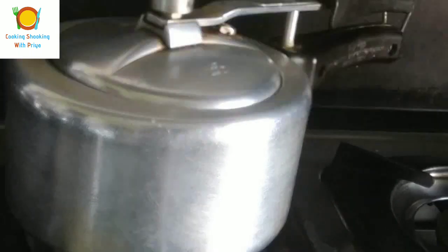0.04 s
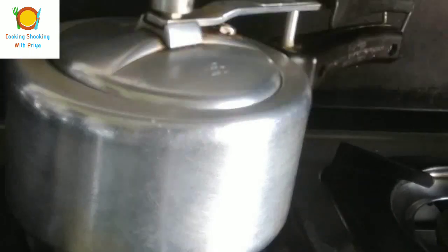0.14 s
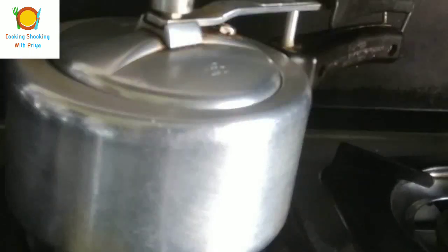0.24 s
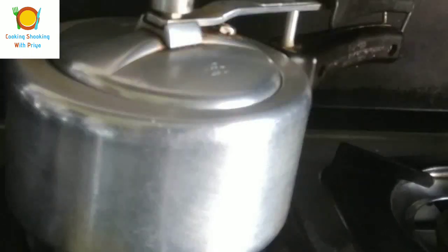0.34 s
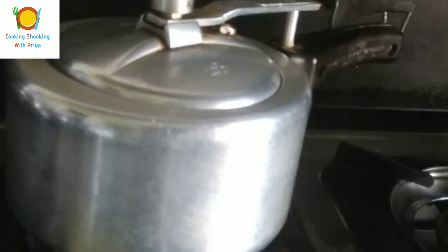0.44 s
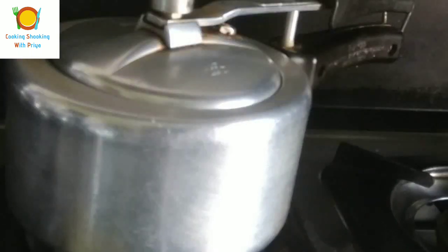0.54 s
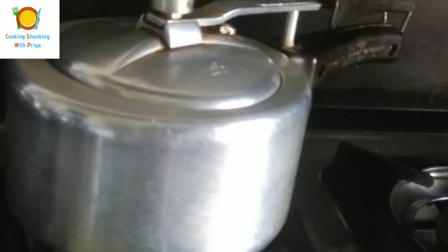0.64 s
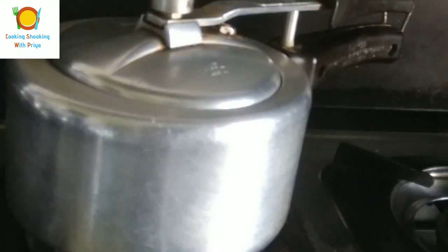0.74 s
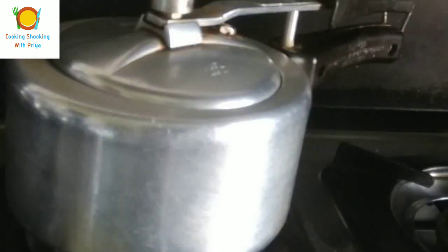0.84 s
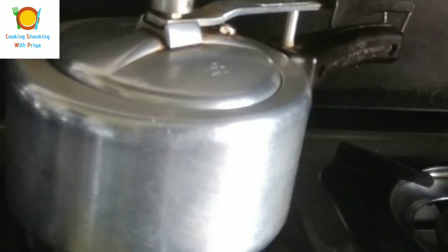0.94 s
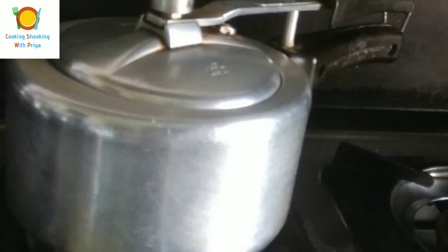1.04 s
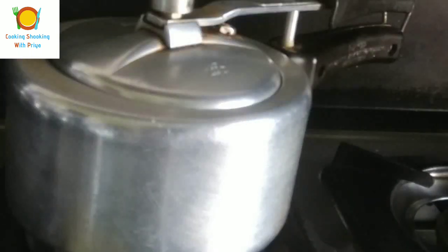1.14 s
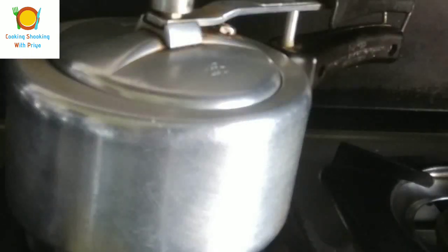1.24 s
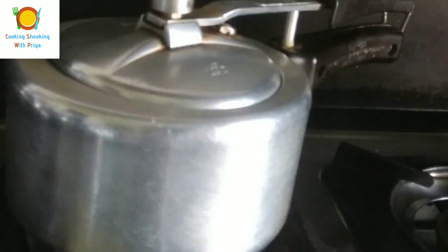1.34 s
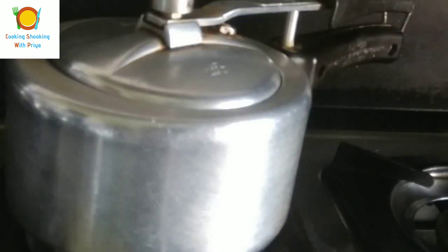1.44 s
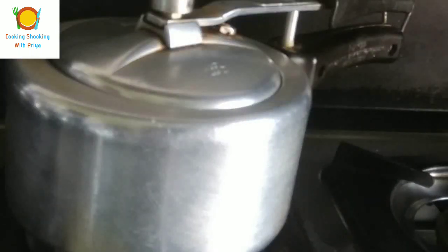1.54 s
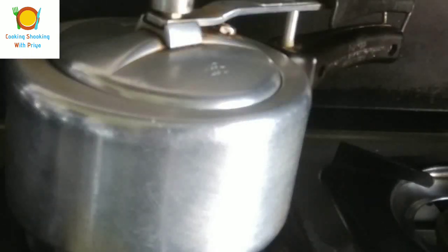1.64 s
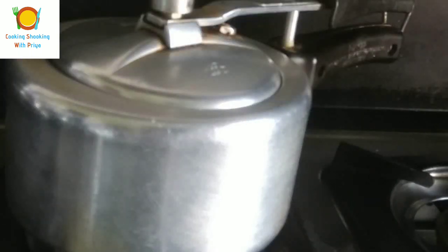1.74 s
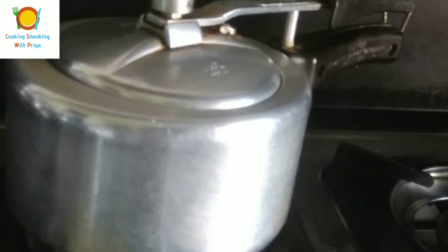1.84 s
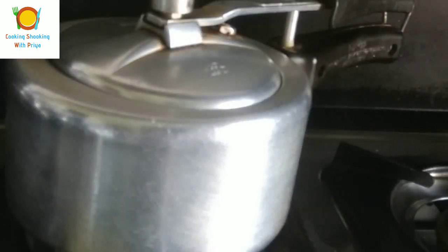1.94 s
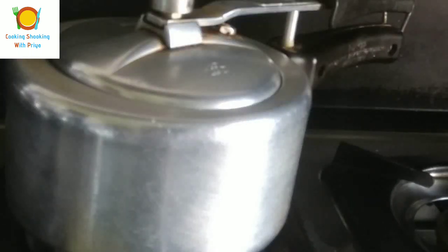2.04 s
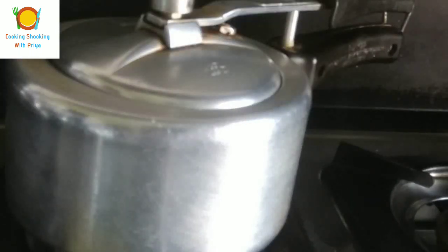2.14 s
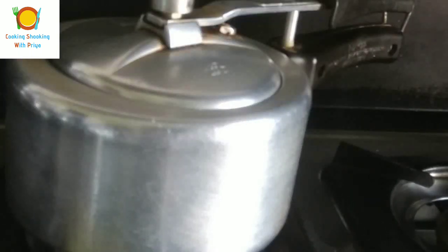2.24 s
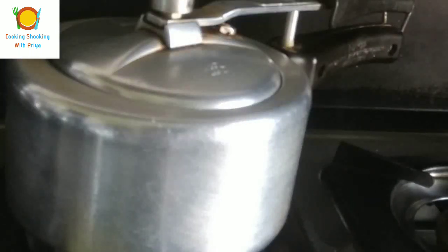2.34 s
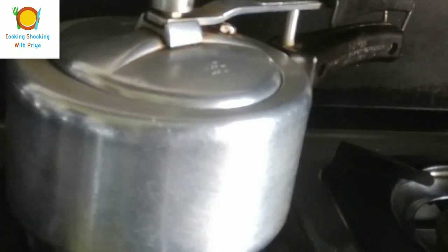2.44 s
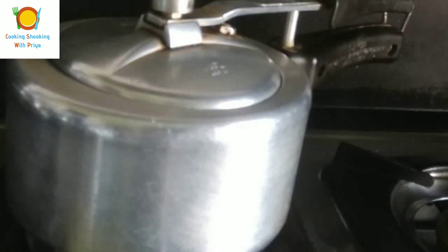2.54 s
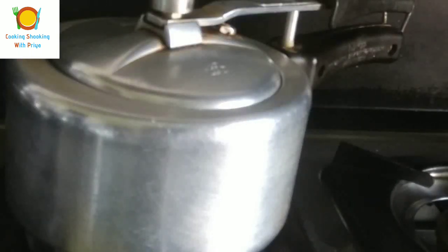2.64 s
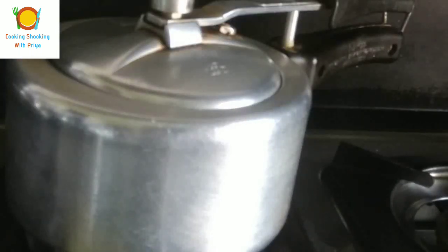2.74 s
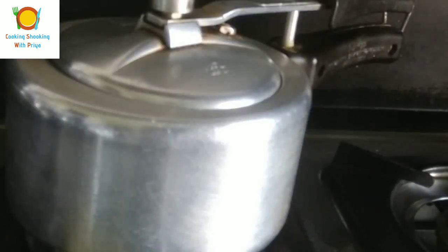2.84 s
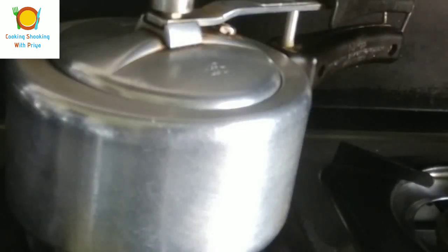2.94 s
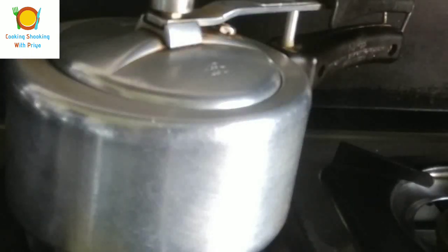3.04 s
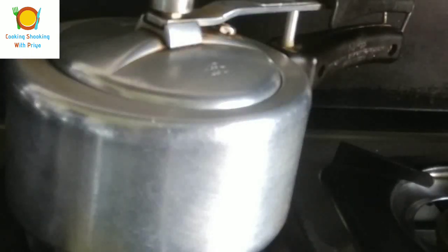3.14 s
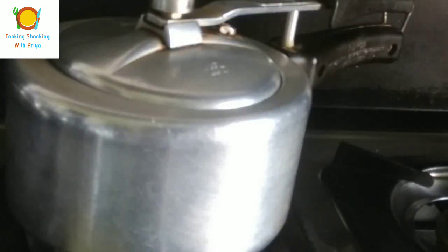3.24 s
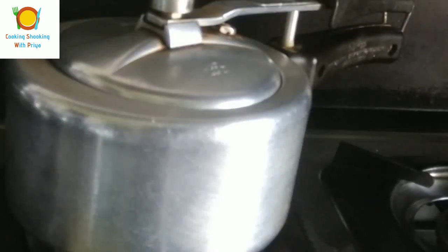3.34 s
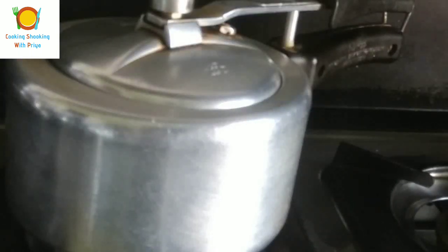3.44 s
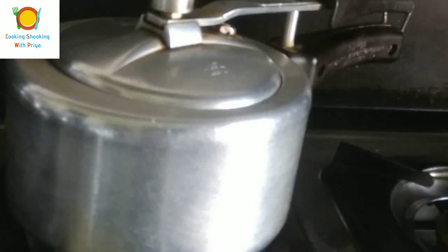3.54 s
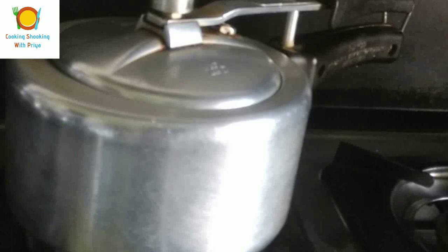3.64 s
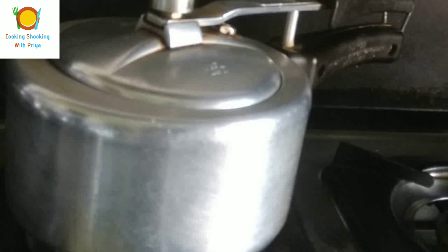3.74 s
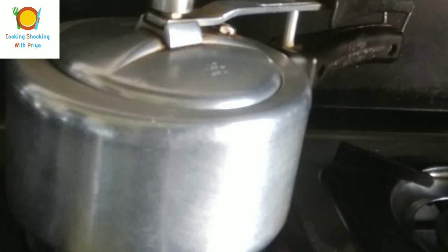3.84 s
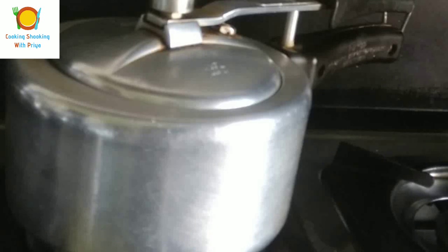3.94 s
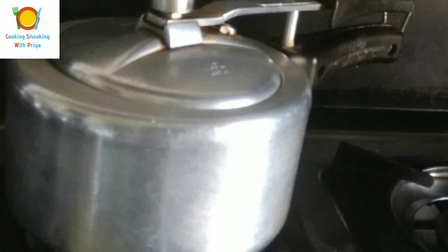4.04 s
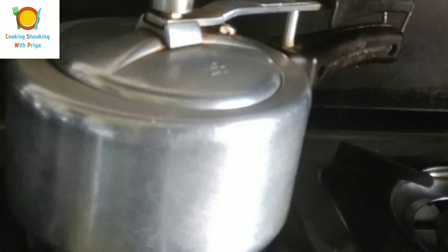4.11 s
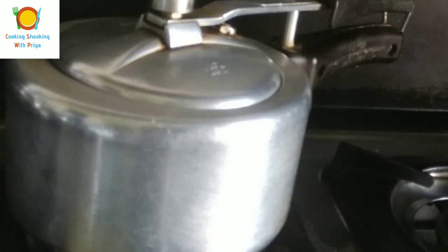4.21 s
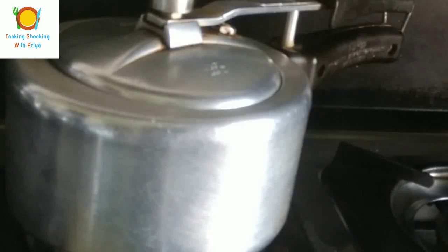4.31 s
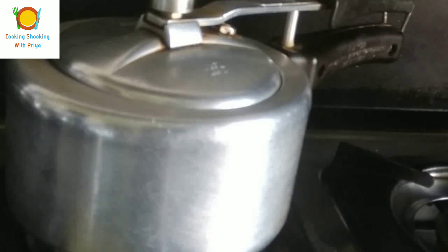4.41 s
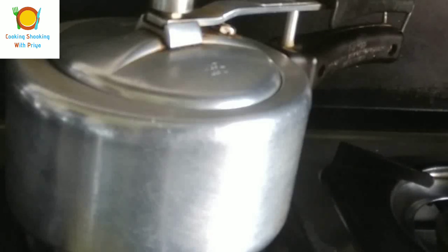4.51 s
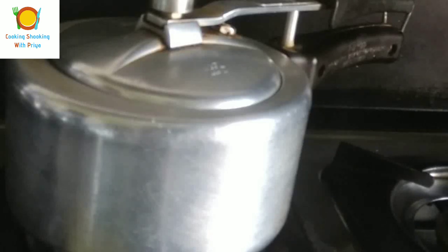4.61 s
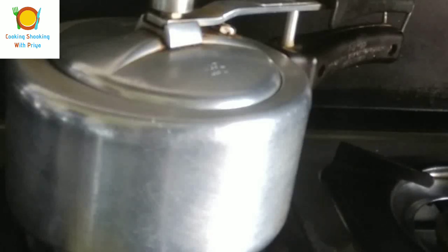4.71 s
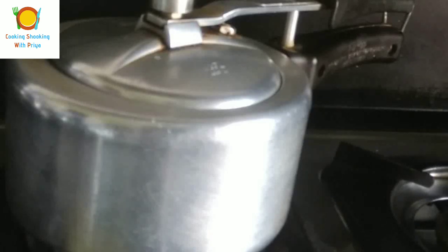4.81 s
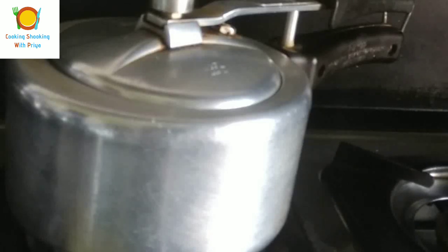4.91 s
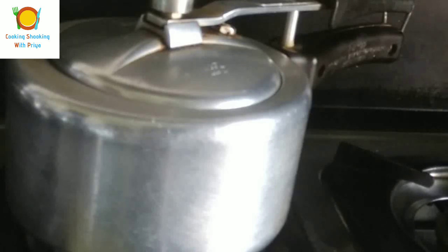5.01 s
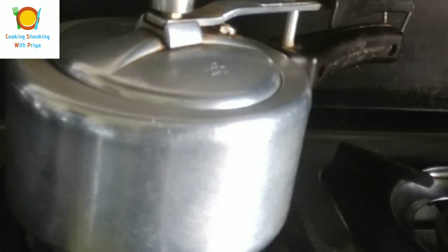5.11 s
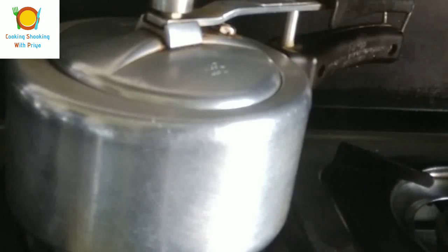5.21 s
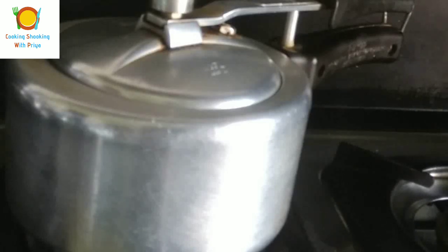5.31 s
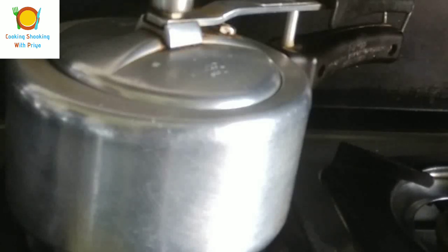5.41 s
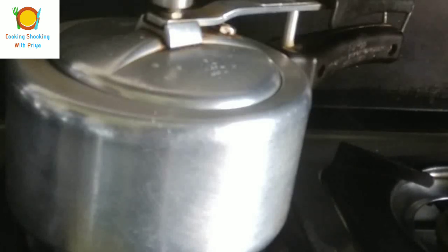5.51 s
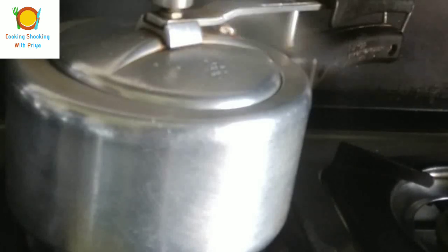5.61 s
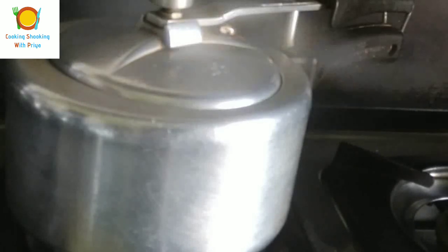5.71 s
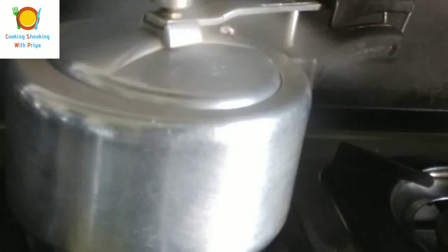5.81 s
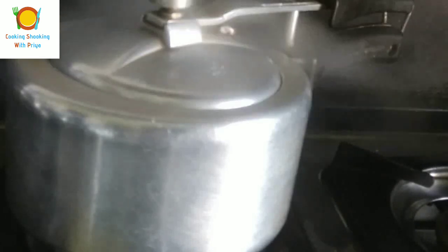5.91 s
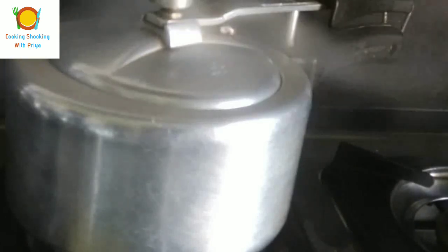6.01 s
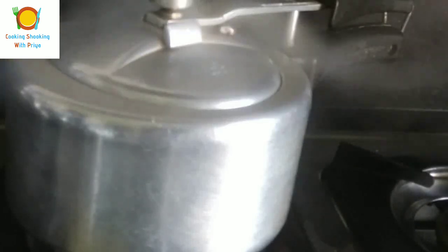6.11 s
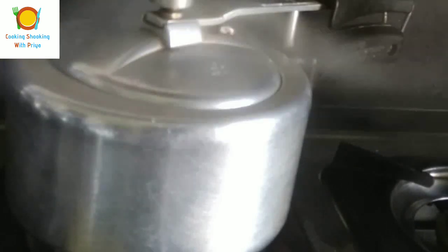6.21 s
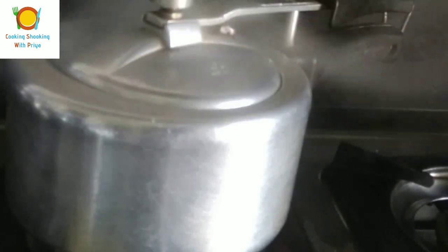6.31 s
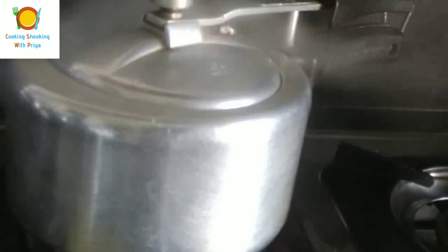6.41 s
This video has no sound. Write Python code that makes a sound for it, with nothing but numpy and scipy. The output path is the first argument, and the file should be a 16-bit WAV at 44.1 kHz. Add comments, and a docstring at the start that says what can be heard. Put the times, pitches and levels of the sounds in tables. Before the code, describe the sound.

Pressure cooker on a gas stove: clipped steam jet, quiet sputtering hiss, two dull knocks, quickening-strength puffs, clinks, then a roaring steam release.

```python
"""A pressure cooker on a gas stove, close to a phone whose right port faces the valve.
A blast of steam, noise coloured by the vent's resonances, is cut off. After a fade-in the valve seeps in three
surges with spat droplets over the burner's low rumble; thin tones at fixed pitches come and go. Two knocks ring
the counter, then a cut. After a second fade-in the weight rocks and the leak, noise throbbing with each puff,
grows stronger. The weight clinks and lifts, the steam blasts out; a whistle of narrow-band noise joins it."""
import sys
import numpy as np
from scipy import signal
from scipy.io import wavfile
from scipy.ndimage import uniform_filter1d

SR = 44100
rng = np.random.default_rng(int(sys.argv[2]) if len(sys.argv) > 2 else 0)


def transcribe(u):
    """Save the signal u as a 16-bit wav file named by the first command-line argument.

    u: samples, shape (n,) or (channels, n), limited to [-1, 1]; the rate is SR.
    q: integer samples, one column per channel.
    """
    v = np.clip(np.atleast_2d(u).T, -1, 1)
    q = np.round(v * 32767).astype(np.int16)
    wavfile.write(sys.argv[1], SR, q)


N = 284886

# Spectrum of the jet through the open vent: frequency_hz, left_db, right_db
BLAST_SPECTRUM = [(40, -42, -30.5), (150, -39, -26.5), (407, -33, -25), (910, -27, -24), (1444, -13, -19.5),
                  (1890, -15, -16.5), (2600, -10.5, -11.5), (2730, -10, -11), (3020, -14.5, -4.5),
                  (3450, -23, -8), (4100, -16.5, -8.5), (4444, -19.5, -6.5), (5240, -12, -4.5),
                  (7100, -10, -2), (7950, -11, -1), (9250, -8.5, 0.5), (10600, -5, -1), (13600, -2.5, -2.5),
                  (15500, -8, -5)]
# Spectrum of the leak under the rocking weight: frequency_hz, left_db, right_db
LEAK_SPECTRUM = [(720, -23, -21), (1410, -14.5, -22), (1750, -15, -16), (1980, -14.5, -14.5),
                 (2340, -13.5, -23), (2630, -19, -10.5), (2970, -17, -9), (3280, -34.5, -13),
                 (3540, -28, -11.5), (3870, -27, -10), (4840, -24, -12), (5240, -18, -3.5),
                 (7100, -16, -1.5), (8760, -15, -4), (10100, -14, 0), (11400, -11.5, -1), (12400, -8.5, -4),
                 (14100, -8.5, -3.5), (15500, -11.5, -15)]
# Spectrum of the steam seeping under the seated weight: frequency_hz, left_db, right_db
SEEP_SPECTRUM = [(4700, -45, -22), (5200, -29, -3), (6000, -28, 0), (7000, -27, -3), (8500, -34, -4),
                 (10800, -32, -2), (11700, -20, -3), (12500, -30, -3), (13700, -32, -7), (14200, -27, -14),
                 (15300, -32, -20)]
# Fuller body that a strong surge adds to the seep: frequency_hz, left_db, right_db
SURGE_SPECTRUM = [(1700, -11, -28), (2680, -13, -7.5), (3470, -29, -2), (4500, -28, 5), (5500, -22, -12),
                  (7500, -23, -16), (9000, -30, -9)]
# Spectrum of the flame before the cut: frequency_hz, left_db, right_db
FLAME_SPECTRUM = [(30, -38, -26), (70.4, -34, -22), (124, 1, 3), (507, 1, 1.5), (615, -10, -11),
                  (800, -4, -3), (937, -10.5, -16.5), (1150, -30, -34)]
# Spectrum of the flame after the second fade-in: frequency_hz, left_db, right_db
HIGH_FLAME_SPECTRUM = [(30, -34, -40), (71.5, -22, -21), (131, 1.5, 1.5), (263, -2, -3), (487, -1.5, -0.5),
                       (575, -3.5, -5), (1030, -7, -10), (1430, -4.5, -6)]
# Spectrum of the rumble's upper edge, mostly on the left: frequency_hz, left_db, right_db
UPPER_RUMBLE_SPECTRUM = [(900, -26, -30), (1025, -1, -12), (1280, -7.5, -27), (1406, 0.5, -16.5),
                         (1900, -38, -32.5), (2450, -28, -23.5), (4000, -56, -51)]
# Resonances of the valve while the weight sits on it: frequency_hz, width_hz, lift_db
VALVE_RESONANCES = [(5240, 90, 5.5), (6050, 95, 11), (11050, 250, 4), (13200, 200, -1.5), (15040, 120, 12)]
# Resonances of the open vent: frequency_hz, width_hz, lift_db
VENT_RESONANCES = [(3000, 310, 1), (3650, 100, -4.5), (3920, 130, 2.5), (4400, 120, -4), (6840, 99, 3),
                   (7210, 63, 1), (8190, 240, 2), (8880, 39, 4.5), (9100, 200, 0.5), (10300, 210, 3.5),
                   (11280, 71, 3), (14300, 270, 0), (14700, 170, 3)]
# Likeness of left and right for sound from the valve: frequency_hz, correlation
PORT_LIKENESS = [(900, .3), (1500, .7), (1750, .99), (2450, .99), (2800, .3), (3400, .1), (9000, .12),
                 (13000, .25)]
# Phase turn that sets left and right opposite near 2 kHz: frequency_hz, turn_rad
PHASE_TURN = [(1000, -.4), (1400, .7), (1700, 1.2), (2400, .45), (3000, 0)]
# Level of the flame after the second fade-in: time_s, level_db
HIGH_FLAME_LEVEL = [(2.556, -79), (2.66, -64.5), (2.8, -61), (3.9, -61), (4.8, -58.5), (5.35, -53),
                    (5.45, -52.5), (6.46, -62.5)]
# Level of the rumble's upper edge: time_s, level_db
UPPER_RUMBLE_LEVEL = [(.15, -104), (.28, -76), (.42, -86), (.64, -78.5), (.86, -89), (.93, -77),
                      (1.04, -74.5), (1.19, -94), (1.28, -84), (1.42, -87), (1.52, -81), (1.66, -84.5),
                      (1.82, -74), (1.96, -78.5), (2.06, -84), (2.16, -77), (2.36, -84.5)]
# Breathy whistle within the second blast: time_s, level_db (right port)
WHISTLE_LEVEL = [(5.75, -31), (6.05, -43), (6.15, -25.5), (6.46, -27.5)]
# Rocks of the weight, before smoothing: puff_s, puff_db, seated_s, seated_db
WEIGHT_ROCKS = [(2.711, -46, 2.741, -51), (2.783, -40, 2.824, -51), (2.85, -45, 2.89, -50),
                (2.974, -41, 3.014, -46), (3.036, -40, 3.082, -49), (3.122, -42, 3.169, -49),
                (3.232, -39.5, 3.283, -46), (3.315, -41, 3.377, -47), (3.49, -35, 3.555, -45),
                (3.608, -36.5, 3.656, -44), (3.713, -36, 3.757, -45), (3.816, -36.5, 3.86, -45),
                (3.947, -33, 4.017, -41), (4.062, -34.5, 4.124, -42), (4.165, -34, 4.209, -41),
                (4.268, -35, 4.328, -41), (4.406, -34, 4.46, -39), (4.498, -34, 4.569, -40),
                (4.623, -32, 4.68, -38), (4.752, -32, 4.82, -38), (4.942, -31, 5.022, -39),
                (5.076, -31, 5.127, -37), (5.225, -26.5, 5.305, -36)]
# Surges of the seep: start_s, level_db, hold_s (until it dies away)
SEEP_SURGES = [(0.228, -60, 0.4), (.905, -59.5, 0.46), (1.736, -59, .47)]
# Droplets spat through the valve, before band-pass and panning: start_s, level_db
SPAT_DROPLETS = [(.2465, -50), (.282, -49), (.307, -47), (.922, -48), (.976, -40), (0.999, -36.5),
                 (1.79, -46), (1.8, -47), (1.831, -39), (2.079, -44), (2.136, -49)]
# Clinks of the weight on the vent as it tips, before panning: start_s, level_db, pitch_hz
WEIGHT_CLINKS = [(5.203, -36.5, 1350), (5.396, -33.5, 1500)]
# Faint tones that come and go: start_s, end_s, pitch_hz, pitch_spread_hz, left_db, right_db
THIN_TONES = [(.55, .68, 3380, 30, -110, -85), (.68, .8, 3365, 10, -110, -75),
              (.8, .94, 3360, 10, -110, -80), (.95, 1.01, 3360, 15, -110, -76),
              (1.04, 1.14, 3360, 12, -110, -73), (1.42, 1.46, 2860, 20, -110, -77),
              (1.51, 1.7, 2860, 10, -110, -74), (1.78, 1.9, 2870, 20, -110, -78),
              (1.95, 2.0, 2850, 15, -110, -74), (1.43, 1.58, 490, 12, -65, -65)]
# Knocks on the counter, before filtering and panning: start_s, level_db
COUNTER_KNOCKS = [(2.411, -37), (2.505, -47.5)]
# Modes of the counter: pitch_hz, level_db, t60_s
COUNTER_MODES = [(206, -14, 0.12), (330, -31, .03), (515, -11, 0.062), (814, -4, 0.011), (1450, -9, 0.0093),
                 (2300, -26, .008)]

CUT_S, RETURN_S, RETURN_DB = 2.527, 2.56, -66
RETURN_KNEE_S, RETURN_KNEE_DB = 0.029, -63.5  # knee: delay after RETURN_S, and level there
FADE_IN_S, FADE_LENGTH_S, FADE_DEPTH_DB = 0.11, 0.17, 22.5

# First blast: its level, the moment it is cut off, and the short tail it leaves
CUT_BLAST_DB, BLAST_CUT_S, TAIL_DROP_DB, TAIL_HOLD_S, TAIL_END_S = -14, .094, 22.5, .011, 0.13
FADE_IN_BLAST_S = .003
CUT_BLAST_BASS_HZ = 220  # the first blast carries no deep bass
# A jet that has run a while is thinner in this band
CUT_BLAST_THIN_HZ, CUT_BLAST_THIN_SHARE = (1800, 4600), .35
# Second blast: the jet opens at a steady rate in dB, overshoots and holds
LIFT_S, OPEN_S, LIFT_DB, BLAST_DB, OVERSHOOT_DB, OVERSHOOT_S = 5.31, 0.11, -51, -15, 1.5, 0.15
WHISTLE_HZ, WHISTLE_WIDTH_HZ = 6220, 76

# The leak flares as the weight lifts
LAST_PUFF_S, LAST_PUFF_DB, LEAK_END_S, LEAK_END_DB = 5.39, -24, 5.46, -28
CALM_HZ = 4900  # the jet is smoother above this
TOP_SPLIT_HZ, TOP_THROB_SHARE = 8500, 0.71  # the highest part throbs a little less
BODY_THROB_SHARE, BODY_MEMORY_S = .55, .12  # the body follows the puffs only in part
SPUTTER_PER_S, SPUTTER_S, SPUTTER_DB = 70, .0015, 1.7  # wet bursts; dB per unit of burst strength
CLINK_T60_S, CLINK_PAN_DB = 0.041, 2

# Each surge swells to a spit soon after it opens
SURGE_ATTACK_S, SPIT_S, SPIT_DB, SPIT_FALL_S = 0.011, 0.098, 3, 0.022
SAG_DB_PER_S, DIE_DB_PER_S, SEEP_REST_DB = 5, 33, -68
# Body gain relative to the flow when it is at SURGE_FULL_DB; it grows as a power of the flow
SURGE_DB, SURGE_POWER, SURGE_FULL_DB = -13, 3.1, -58
SEEP_SPLIT_HZ, SEEP_LOW_POWER = 8000, 1.9  # below the split the seep dies faster
DROPLET_HZ, DROPLET_T60_S = (5200, 13500), .004

BURNER_DB = -65
BLOW_TOP_HZ = 2600  # a soft contact carries little treble
RATTLE_T60_S, RATTLE_HZ = .2, (150, 1400)  # noisy tail of each knock
THIN_HISS_HZ, THIN_HISS_WIDTH_HZ, THIN_HISS_DB = 14580, 200, -70.5  # level is the mean of the two ports
TONE_SWELL_DB = 5  # each tone is softer at its ends

PORT_LAG_S = .00018  # sound from the valve reaches the left port later
TURN_DRIFT_RAD = .5  # spread of the drift in the phase turn, so the spectral hollow shifts
TOP_HZ = 15460


def blast():
    """Turbulent jet noise: the open vent's resonances colour a full flow of steam."""
    tail_db = CUT_BLAST_DB - TAIL_DROP_DB
    first = curve([(0, CUT_BLAST_DB), (BLAST_CUT_S, CUT_BLAST_DB), (BLAST_CUT_S + 0.0018, tail_db),
                   (BLAST_CUT_S + TAIL_HOLD_S, tail_db - 0.5), (TAIL_END_S, -87)])
    first = first * np.minimum(np.arange(N) / SR / FADE_IN_BLAST_S, 1)
    open_s = LIFT_S + OPEN_S
    second = curve([(LIFT_S, LIFT_DB), (open_s, BLAST_DB + OVERSHOOT_DB),
                    (open_s + OVERSHOOT_S, BLAST_DB), (N / SR, BLAST_DB)])
    likeness = [(900, 0.075), (1700, 0.48), (2400, 0.51), (3000, 0.042), (9000, .1), (14000, 0.14)]
    jet = hiss(BLAST_SPECTRUM, likeness, VENT_RESONANCES,
               patchy_db=3.0, flutter_db=0.5, calm_share=0.8, streak_db=1.1)
    band = zero_phase(jet, 2, CUT_BLAST_THIN_HZ, "bandpass")
    thin_jet = zero_phase(jet - CUT_BLAST_THIN_SHARE * band, 2, CUT_BLAST_BASS_HZ, "highpass")
    whistle = narrow(WHISTLE_HZ, WHISTLE_WIDTH_HZ) * curve(WHISTLE_LEVEL) * undb([[-9], [0]])
    return thin_jet * first + jet * second + whistle


def leak():
    """Flow-modulated noise: each rock of the weight lets out a sputtering puff, deepest in the lower treble."""
    rows = [(RETURN_S, RETURN_DB), (RETURN_S + RETURN_KNEE_S, RETURN_KNEE_DB)]
    for puff_s, puff_db, seated_s, seated_db in WEIGHT_ROCKS:
        rows += [(puff_s, puff_db), (seated_s, seated_db)]
    rows += [(LAST_PUFF_S, LAST_PUFF_DB), (LEAK_END_S, LEAK_END_DB)]
    # abs guards the powers below against rounding under zero
    flow = np.abs(uniform_filter1d(curve(rows), 600))
    mean_flow = np.abs(uniform_filter1d(flow, int(BODY_MEMORY_S * SR)))

    def throb(share):
        """Geometric mixing: blend the momentary flow with its running mean."""
        return flow ** share * mean_flow ** (1 - share)

    steam = hiss(LEAK_SPECTRUM, PORT_LIKENESS, VALVE_RESONANCES,
                 patchy_db=2.8, flutter_db=.6, calm_share=.55, streak_db=1.2)
    body = zero_phase(steam, 4, CALM_HZ)
    below_top = zero_phase(steam, 4, TOP_SPLIT_HZ)
    top = (steam - below_top) * throb(TOP_THROB_SHARE)
    lower_treble = (below_top - body) * flow

    size = int(SPUTTER_S * SR)
    drops = (rng.random(N) < SPUTTER_PER_S / SR) * rng.exponential(size=N)
    bursts = np.minimum(size * uniform_filter1d(drops, size), 3)
    sputter = undb(SPUTTER_DB * bursts)
    return sputter * (top + lower_treble) + body * throb(BODY_THROB_SHARE)


def clinks():
    """Damped oscillation: each tip of the weight is one short dull ring, slightly to the left."""
    t, out = np.arange(SR // 10) / SR, np.zeros(N)
    for start_s, level_db, pitch_hz in WEIGHT_CLINKS:
        i = int(start_s * SR)
        out[i:i + len(t)] += undb(level_db) * np.sin(2 * np.pi * pitch_hz * t) * decay(t, CLINK_T60_S)
    return out * undb([[CLINK_PAN_DB], [-CLINK_PAN_DB]])


def seep():
    """Flow noise of a narrow gap: as a surge weakens, its lower body falls faster than its treble."""
    flow = faded_in(SEEP_REST_DB)
    for start_s, level_db, hold_s in SEEP_SURGES:
        spit_s, die_s = start_s + SPIT_S, start_s + hold_s
        end_s = min(die_s + .5, CUT_S)
        sagged_db = level_db - SAG_DB_PER_S * hold_s
        surge = curve([(start_s, SEEP_REST_DB), (start_s + SURGE_ATTACK_S, level_db),
                       (spit_s, level_db + SPIT_DB), (spit_s + SPIT_FALL_S, level_db),
                       (die_s, sagged_db), (end_s, sagged_db - DIE_DB_PER_S * (end_s - die_s))])
        flow = np.maximum(flow, surge)
    strength = flow / undb(SURGE_FULL_DB)
    body_gain = undb(SURGE_DB) * flow * strength ** (SURGE_POWER - 1)
    # here the valve's resonances lift only half as many dB
    resonances = [(hz, width_hz, lift_db / 2) for hz, width_hz, lift_db in VALVE_RESONANCES]
    steam = hiss(SEEP_SPECTRUM, PORT_LIKENESS, resonances, patchy_db=3, flutter_db=.8)
    lower = zero_phase(steam, 4, SEEP_SPLIT_HZ)
    treble = steam - lower + lower * strength ** (SEEP_LOW_POWER - 1)
    body = hiss(SURGE_SPECTRUM, PORT_LIKENESS, patchy_db=7, flutter_db=0.0)
    return treble * flow + body * body_gain


def droplets():
    """Impulsive noise: each droplet is a short bright crack, mostly on the port that faces the valve."""
    t, out = np.arange(SR // 50) / SR, np.zeros(N)
    cracks = rng.standard_normal((len(SPAT_DROPLETS), len(t)))
    for (start_s, level_db), crack in zip(SPAT_DROPLETS, cracks):
        i = int(start_s * SR)
        out[i:i + len(t)] += undb(level_db) * crack * decay(t, DROPLET_T60_S)
    sos = signal.butter(6, DROPLET_HZ, "bandpass", fs=SR, output="sos")
    return signal.sosfilt(sos, out) * undb([[-18], [4]])


def burner():
    """Combustion noise: a flame's broad low rumble, alike on both ports in the bass, with a steep treble slope."""
    no_path = dict(lag_s=0, turn=[(0, 0)])  # no delay or fixed phase turn between left and right
    low = hiss(FLAME_SPECTRUM + [(4000, -90, -90)], [(150, 0.84), (600, .6), (1200, 0.018)],
               patchy_db=2.5, flutter_db=0.5, **no_path)
    upper = hiss(UPPER_RUMBLE_SPECTRUM, [(900, .2), (1200, .02)],
                 patchy_db=5.0, flutter_db=0.0, **no_path)
    high = hiss(HIGH_FLAME_SPECTRUM + [(3000, -53, -18.5)], [(150, 1.0), (600, 0.92), (1400, 0.19)],
                patchy_db=0.5, flutter_db=0.5, **no_path)
    upper_gain = curve(UPPER_RUMBLE_LEVEL + [(CUT_S, -76)])
    return low * faded_in(BURNER_DB) + upper * upper_gain + high * curve(HIGH_FLAME_LEVEL)


def knocks():
    """Modal synthesis: a soft blow rings the counter's modes and leaves a dull rattle, stronger on the left."""
    t, out = np.arange(SR // 8) / SR, np.zeros(N + SR)
    ring = sum(undb(level_db) * np.sin(2 * np.pi * pitch_hz * t) * decay(t, t60_s)
               for pitch_hz, level_db, t60_s in COUNTER_MODES)
    dull = signal.butter(4, RATTLE_HZ, "bandpass", fs=SR, output="sos")
    for start_s, level_db in COUNTER_KNOCKS:
        rattle = signal.sosfilt(dull, rng.standard_normal(len(t))) * decay(t, RATTLE_T60_S)
        i = int(start_s * SR)
        before_cut = t < CUT_S - start_s
        out[i:i + len(t)] += undb(level_db) * (ring + rattle) * before_cut
    out = signal.sosfilt(signal.butter(8, BLOW_TOP_HZ, fs=SR, output="sos"), out[:N])
    return out * undb([[-2], [-10]])


def faint_tones():
    """Narrow-band noise and frequency modulation: a thin high hiss on the left, and thin tones that come and go."""
    high = narrow(THIN_HISS_HZ, THIN_HISS_WIDTH_HZ) * faded_in(THIN_HISS_DB)
    out = high * np.array([[2], [0]])
    for start_s, end_s, pitch_hz, spread_hz, left_db, right_db in THIN_TONES:
        pitch = pitch_hz + spread_hz * wander((N,), (400,))  # wavers about its fixed pitch
        tone = np.sqrt(2) * np.sin(2 * np.pi * np.cumsum(pitch) / SR)
        tone = tone * undb(3.5 * wander((N,), (400,)))
        swell = curve([(start_s, -TONE_SWELL_DB), ((start_s + end_s) / 2, 0), (end_s, -TONE_SWELL_DB)],
                      edge_s=0.12)
        out = out + tone * swell * undb([[left_db], [right_db]])
    return out


def hiss(spectrum, likeness, peaks=(), patchy_db=1.5, flutter_db=.7, lag_s=PORT_LAG_S,
         calm_share=1, streak_db=0, turn=PHASE_TURN):
    """Partially coherent noise: shared and separate parts set left-right correlation; their mean has rms 1."""
    white = rng.standard_normal((2, N + 4096))
    hz, _, (own, right) = signal.stft(white, SR, nperseg=1024)
    log_hz, points = np.log(hz + 1), np.array(spectrum, float)
    like_hz, correlation = np.transpose(likeness)
    alike = np.clip(np.interp(log_hz, np.log(like_hz), correlation), -.99, .99)[:, None]
    drift = np.exp(1j * TURN_DRIFT_RAD * wander(own.shape, (6, 4)))
    phase = 2 * np.pi * hz * lag_s + np.interp(hz, *np.transpose(turn))
    shared = alike * right * np.exp(-1j * phase)[:, None] * drift
    pair = np.array([shared + np.sqrt(1 - alike ** 2) * own, right])

    db = np.array([np.interp(log_hz, np.log(points[:, 0]), points[:, k], -90, points[-1, k])
                   for k in (1, 2)])
    db = db + sum(lift_db / (1 + ((hz - peak_hz) / (width_hz / 2)) ** 2)
                  for peak_hz, width_hz, lift_db in peaks)
    # small patches flicker alone, by calm_share above CALM_HZ
    patches = wander(own.shape, (2, 4)) * np.where(hz > CALM_HZ, calm_share, 1)[:, None]
    streaks = wander(own.shape, (2, 30))  # narrow resonances that last a third of a second
    gain = undb(db[:, :, None] + patchy_db * patches + streak_db * streaks)
    x = signal.istft(pair * gain, SR, nperseg=1024)[1][:, 2048:2048 + N]
    x = x * undb(flutter_db * wander((N,), (500,)))
    return x / x.mean(0).std()


def narrow(hz, width_hz):
    """Narrow-band noise: a steep band of rms 1 is heard as a wavering tone."""
    edges_hz = [hz - width_hz / 2, hz + width_hz / 2]
    sos = signal.butter(2, edges_hz, "bandpass", fs=SR, output="sos")
    x = signal.sosfilt(sos, rng.standard_normal(N))
    return x / x.std()


def wander(shape, span):
    """Smoothed random process of spread 1; span counts the cells averaged, twice, along each axis."""
    x = rng.standard_normal(shape)
    for axis, cells in enumerate(span):
        x = uniform_filter1d(uniform_filter1d(x, cells, axis=axis), cells, axis=axis)
    return x / x.std()


def zero_phase(x, order, hz, kind="lowpass"):
    """Zero-phase filtering: forward and backward passes cancel delay, so bands subtract cleanly."""
    return signal.sosfiltfilt(signal.butter(order, hz, kind, fs=SR, output="sos"), x)


def decay(t, t60_s):
    """Exponential damping: the amplitude falls by 60 dB in t60_s."""
    return 1000. ** (-t / t60_s)


def undb(db):
    """Decibel law: amplitude ratio of a level in dB."""
    return 10 ** (np.asarray(db) / 20)


def curve(rows, edge_s=.002):
    """Gain envelope: straight lines in dB through time_s, level_db rows, silent outside them."""
    s, db = np.transpose(rows)
    times = [s[0] - edge_s, *s, s[-1] + edge_s]
    return undb(np.interp(np.arange(N) / SR, times, [-150, *db, -150]))


def faded_in(db):
    """Gain envelope of a steady sound between the first fade-in and the cut."""
    return curve([(FADE_IN_S, db - FADE_DEPTH_DB), (FADE_IN_S + FADE_LENGTH_S, db), (CUT_S, db)])


def scene():
    """Superposition: the pressures of all sources add."""
    return blast() + leak() + clinks() + seep() + droplets() + burner() + knocks() + faint_tones()


def record(dry):
    """Band limits and overload: the phone adds faint noise, drops deep bass, clips peaks and cuts the top."""
    own_noise = undb(-92.5) * rng.standard_normal(dry.shape)
    thin = signal.sosfilt(signal.butter(2, 70, "highpass", fs=SR, output="sos"), dry + own_noise)
    top_cut = signal.ellip(12, .3, 66, TOP_HZ, fs=SR, output="sos")
    return np.clip(signal.sosfilt(top_cut, np.clip(thin, -.9, .9)), -1, 1)


dry = scene()
out = record(dry)
transcribe(out)
```